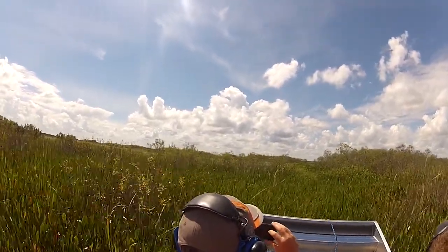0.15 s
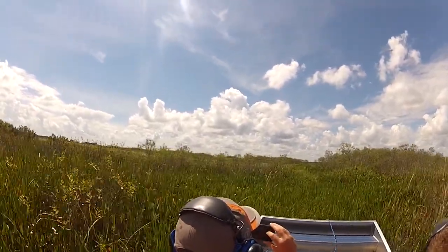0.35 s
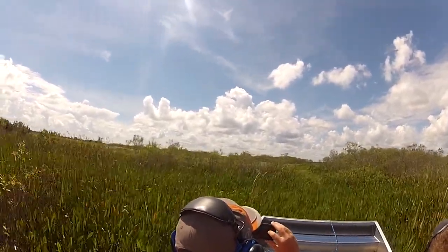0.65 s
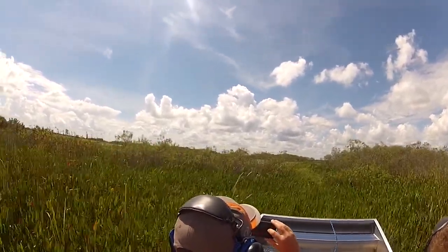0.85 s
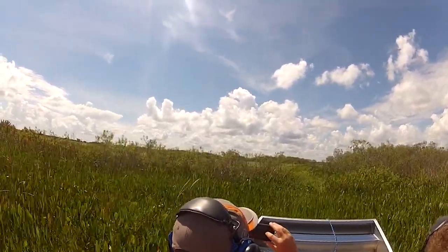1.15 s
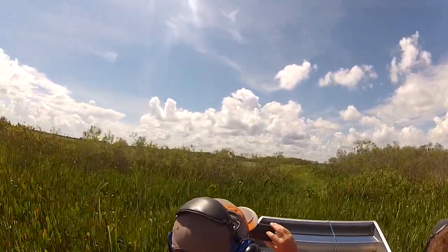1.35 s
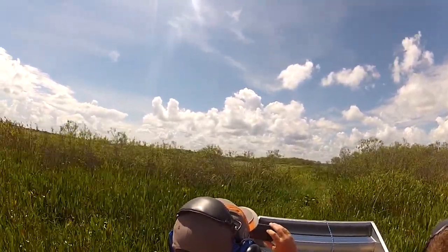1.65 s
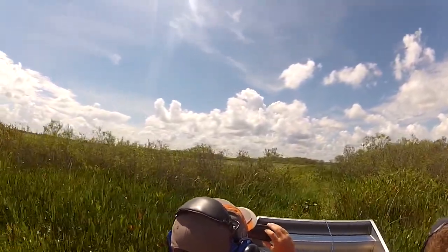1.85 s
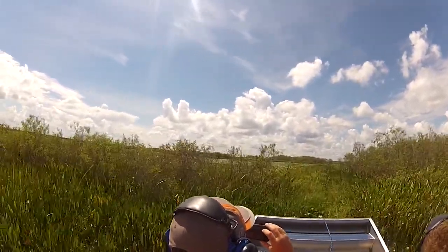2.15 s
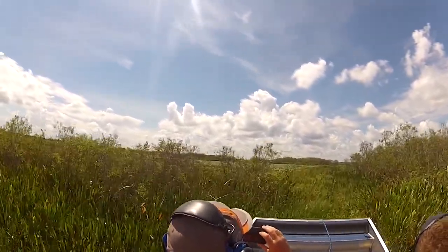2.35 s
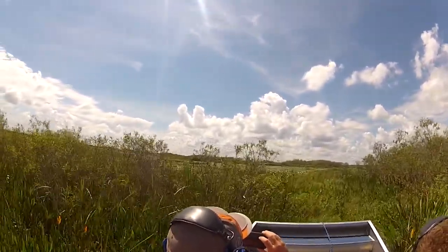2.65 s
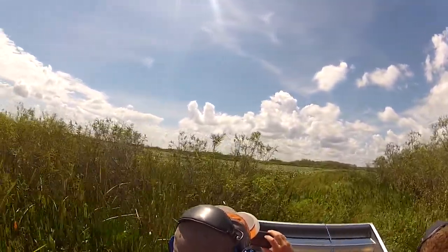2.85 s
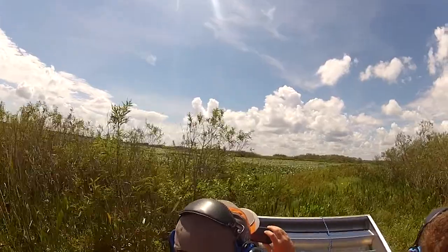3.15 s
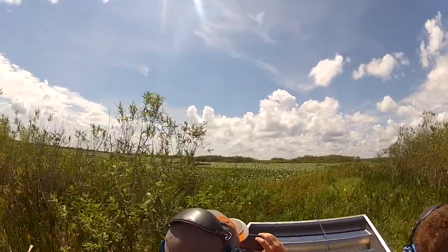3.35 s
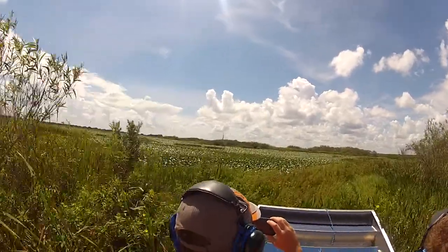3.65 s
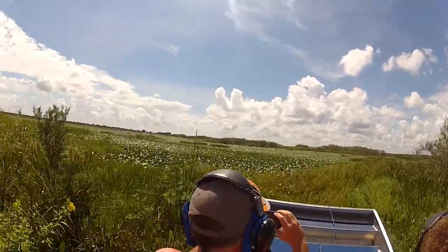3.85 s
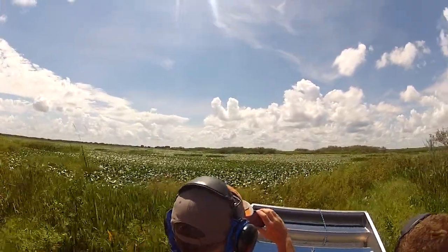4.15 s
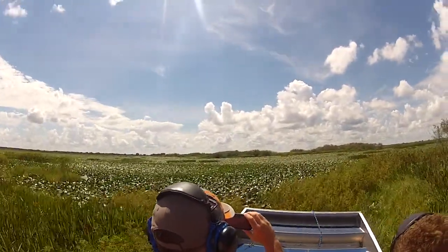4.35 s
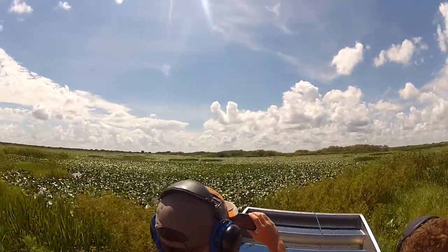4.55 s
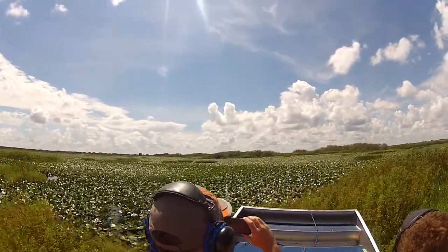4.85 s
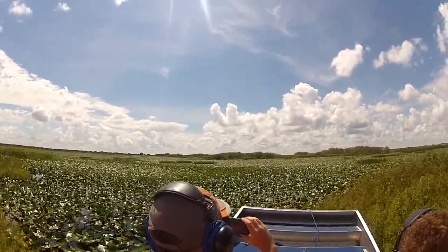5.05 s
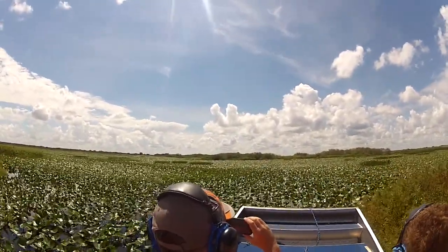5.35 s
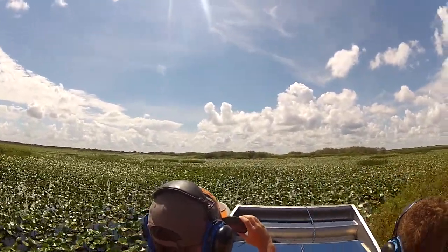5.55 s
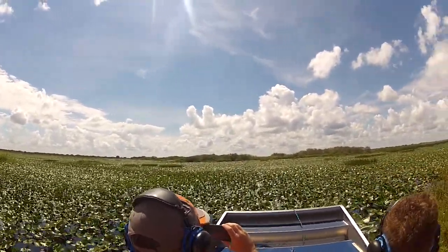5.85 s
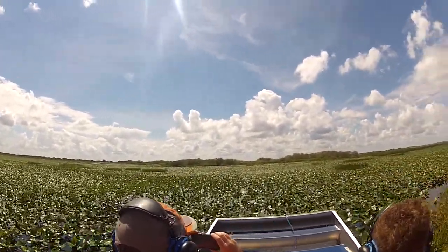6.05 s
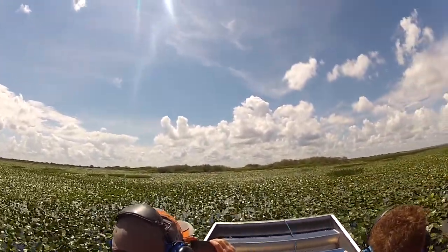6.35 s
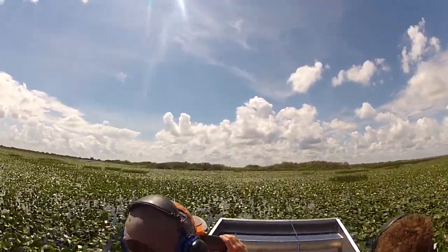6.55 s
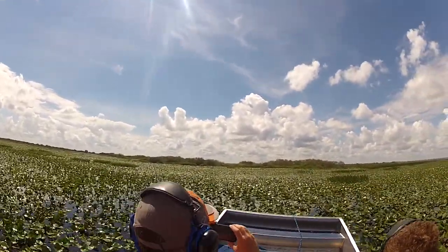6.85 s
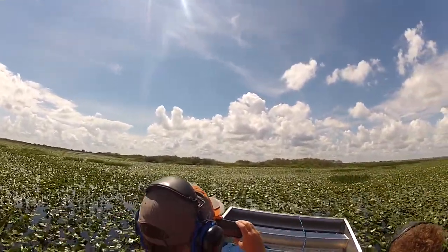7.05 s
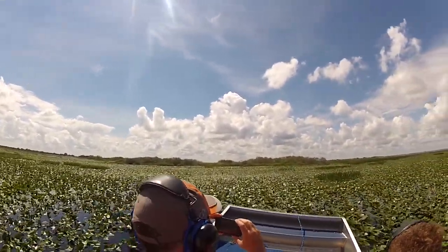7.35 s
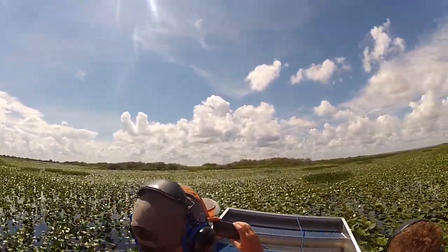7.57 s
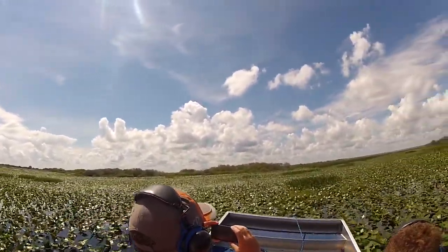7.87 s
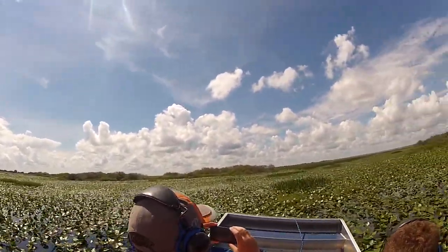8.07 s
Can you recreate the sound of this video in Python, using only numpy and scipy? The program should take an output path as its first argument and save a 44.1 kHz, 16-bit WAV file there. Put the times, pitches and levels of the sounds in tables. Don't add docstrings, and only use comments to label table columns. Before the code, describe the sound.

An airboat ride over open swamp, heard from on board through a small sealed camera. From 0 to about 2.5 seconds a big engine and propeller hold a steady cruise: a low, buzzing drone near 77 hertz with strong overtones, uneven exhaust throb beating against it, faint gear whine and windy hiss. A tiny metal tick comes at 1.4. From 2.5 the pitch and loudness climb, fastest after 3, reaching a full, dense roar around 4 with heavy slipstream rush and slight overload. Another tick falls at 4.4. The throttle eases, dropping quickly after 5, with a tick at 5.4, to a deeper, quieter drone by 6.8; a quick double tick at 6.5 and one last at 6.8. Then the engine pulls again, rising back to cruise by 7.6 and holding to the end, about 8.2. The sound is hollow in the mids, gritty on top, without echo.

```python
import sys
import numpy as np
from scipy import signal
from scipy.fft import rfft, irfft, next_fast_len
from scipy.io import wavfile
from scipy.ndimage import uniform_filter1d, map_coordinates

SR = 44100
rng = np.random.default_rng(int(sys.argv[2]) if len(sys.argv) > 2 else 0)


def gain_from_decibels(decibels):
    exponent = np.asarray(decibels, float) / 20
    return 10 ** exponent


def to_wav(sig):
    pcm = np.clip(np.atleast_2d(sig), -1, 1) * 32767
    pcm = np.round(pcm).astype(np.int16)
    wavfile.write(sys.argv[1], SR, pcm.T)


N = 362061
TIME = np.arange(N) / SR
CRUISE_HZ = 77

# (blade rate [Hz], blade tone [dB], octave [dB])
BLADE_TONE = [(65.4, -27.5, -21.5), (69.4, -28, -22.5), (75.9, -24, -21.5), (78.8, -22, -17.5),
              (82, -17.5, -19), (86.3, -16, -15.5), (91.9, -12.5, -7), (98, -13.1, -6.1)]
# (blade rate [Hz], harmonics 3, 4, 5 and 6 [dB])
LOW_HARMONICS = [(66.0, -29.0, -34.0, -42.0, -53.0), (70.0, -36.0, -39.0, -44.0, -49.0),
                 (75.0, -37.5, -47.5, -47.0, -50.5), (77.5, -41.5, -45.0, -47.0, -40.0),
                 (82.0, -38.0, -40.5, -51.0, -36.5), (86.0, -34.5, -37.5, -50.0, -40.0),
                 (90.0, -34.0, -34.0, -43.5, -37.0), (97.0, -27.5, -43.5, -36.0, -37.0)]
# (blade rate [Hz], harmonics 7, 8, 9 and 11 [dB])
MID_HARMONICS = [(66.0, -41.5, -50.5, -61.0, -63.0), (70.0, -55.0, -49.0, -61.0, -62.0),
                 (75.0, -46.5, -49.0, -47.5, -60.0), (77.5, -40.5, -51.5, -51.0, -54.5),
                 (82.0, -42.0, -46.0, -50.0, -48.5), (86.0, -46.5, -50.5, -53.0, -56.0),
                 (90.0, -41.0, -46.0, -56.5, -47.5), (97.0, -38.5, -46.5, -48.0, -34.5)]
# (blade harmonic [number], growth [dB per unit of load], negative where load
HARMONIC_LOAD = [(3, 2.4), (4, -1.2), (5, 2), (6, .2), (7, -.7), (8, 1.4), (9, .7), (11, 2.3)]
# (harmonic [number], rms level slow, cruising, climbing and full [dB])
HIGH_HARMONICS = [(10, -54.5, -54.5, -54.0, -47.0), (12, -62.0, -50.5, -52.5, -39.5),
                  (13, -60.0, -52.0, -43.0, -61.5), (14, -65.0, -47.5, -54.0, -63.5),
                  (20, -62.0, -61.5, -65.5, -49.5), (24, -62.5, -60.5, -56.5, -49.0)]
# (shaft harmonic [number], rms level slow, cruising, climbing and full [dB])
SHAFT_IMBALANCE = [(1, -63.5, -57.0, -55.0, -49.0), (2, -59.0, -54.0, -48.0, -44.0),
                   (4, -48.0, -44.0, -45.0, -49.5), (5, -50.5, -46.5, -47.5, -38.0),
                   (10, -50.0, -52.5, -58.5, -49.5)]


def propeller(passes):
    tone_db, octave_db = at_speed(BLADE_TONE)
    speed, load = throttle()
    overtones_db = 1.4
    gain_db = overtones_db + .08 * np.maximum(speed - CRUISE_HZ, 0)
    blade = passes + .5
    octave_lead = by_speed((.07, -.01, .17))
    twelfth_lead = .17

    sound = tone(blade, tone_db, flutter_db=0.53, slip=.004)
    sound += tone(2 * blade + octave_lead, octave_db, flutter_db=0.4, slip=0.0082)
    harmonics_db = at_speed(LOW_HARMONICS) + at_speed(MID_HARMONICS)
    for db, (k, load_db) in zip(harmonics_db, HARMONIC_LOAD):
        sound += tone(k * blade + twelfth_lead, db + load_db * load + gain_db, flutter_db=1.8, slip=0.03)
    for k, *db in HIGH_HARMONICS:
        sound += tone(k * (blade + .4), by_setting(db) + overtones_db, flutter_db=1.8, slip=.035)

    shaft = blade / 3
    for k, *db in SHAFT_IMBALANCE:
        sound += tone(k * shaft, by_setting(db), flutter_db=4.5, slip=0.12)
    return sound


# (blade rate [Hz], camshaft orders 5, 6, 8 and 11 [dB])
MAIN_ORDERS = [(66.0, -29.6, -44.6, -32.2, -40.2), (70.0, -29.6, -37.2, -31.3, -34.6),
               (75.0, -31.9, -30.6, -35.6, -37.5), (78.0, -25.4, -26.8, -30.0, -45.2),
               (82.0, -26.9, -24.0, -29.2, -51.2), (86.0, -27.9, -27.6, -32.9, -49.0),
               (90.0, -30.1, -32.9, -32.3, -49.5), (97.0, -39.7, -32.7, -31.6, -43.7)]
# (camshaft order [number], rms level slow, cruising, climbing and full [dB])
WEAK_ORDERS = [(2, -52.5, -44.0, -39.5, -34.5), (7, -47.5, -41.0, -44.5, -46.5),
               (12, -58.5, -43.5, -51.0, -49.5), (14, -62.0, -53.5, -52.0, -52.0),
               (15, -63.0, -53.5, -52.0, -50.0), (16, -51.0, -52.0, -52.0, -52.0)]
# (blade rate [Hz], camshaft orders 3, 4, 9 and 10 [dB])
BETWEEN_ORDERS = [(66.0, -49.5, -44.0, -49.5, -48.5), (70.0, -52.5, -48.0, -44.0, -58.5),
                  (75.0, -42.0, -47.5, -39.0, -50.5), (77.5, -48.5, -51.5, -41.0, -38.0),
                  (82.0, -41.5, -45.5, -41.0, -41.5), (86.0, -35.5, -47.0, -43.0, -33.0),
                  (90.0, -37.0, -41.0, -42.5, -31.5), (97.0, -37.5, -34.0, -43.0, -36.5)]
# (camshaft order [number], growth [dB per unit of load])
BETWEEN_ORDER_LOAD = [(3, .7), (4, .4), (9, 2.7), (10, -.5)]


def exhaust(passes):
    cam = .38186 * passes + .025
    load = throttle()[1]
    fifth_db, sixth_db, firing_db, eleventh_db = at_speed(MAIN_ORDERS)
    firing_lead = by_speed((.1, -.15, .3))
    sound = tone(5 * cam, fifth_db + 1.9 * load, flutter_db=1.0, slip=0.047)
    sound += tone(6 * cam, sixth_db + .9 * load, flutter_db=1.0, slip=0.047)
    sound += tone(8 * cam + firing_lead, firing_db + 2.1 * load, flutter_db=1.0, slip=0.047)
    sound += tone(11 * cam, eleventh_db + 3.7 * load, flutter_db=1.0, slip=0.047)

    minor_db = .3
    for k, *db in WEAK_ORDERS:
        sound += tone(k * (cam + 0.252), by_setting(db) + minor_db, flutter_db=2.5, slip=0.059)
    for db, (k, load_db) in zip(at_speed(BETWEEN_ORDERS), BETWEEN_ORDER_LOAD):
        sound += tone(k * (cam + 0.255), db + load_db * load + minor_db, flutter_db=3.0, slip=0.051)
    return sound


# (blade rate [Hz], reduction gear whine [dB], pump whine [dB])
GEAR_WHINE = [(66.2, -41, -70), (67.6, -56, -70), (69.5, -46, -70), (71.5, -57, -70), (73.5, -47, -70),
              (75.8, -60, -70), (77, -49, -68), (78.3, -46, -46), (80, -58, -62), (83, -40, -62),
              (88, -55, -70)]


def gears(passes):
    gear_db, pump_db = at_speed(GEAR_WHINE)
    load = throttle()[1]
    pump = tone(124 / 3 * passes, pump_db, flutter_db=1.5, slip=0.12)
    return pump + tone(110 / 3 * passes, gear_db + 1.5 * load, flutter_db=2, slip=0.15)


# (frequency [Hz], level [dB per Hz])
WASH_SPECTRUM = [(25, -6), (45, -9), (110, -11), (170, 8.5), (300, -3), (420, -2), (600, -36)]
# (frequency [Hz], level [dB per Hz])
BODY_SPECTRUM = [(250, -22), (400, -3.5), (560, 2.5), (680, 2), (780, -6), (900, -4.5), (1000, -12),
                 (1200, -29)]
# (frequency [Hz], level [dB per Hz])
CAVITY_SPECTRUM = [(700, -14.5), (950, -7), (1040, -3), (1112, 5.5), (1165, -4.5), (1240, -23), (1400, -25)]
# (frequency [Hz], level [dB per Hz])
HISS_SPECTRUM = [(1100, -54), (1240, -16), (1420, -9), (1760, -19), (1860, -7.5), (1940, 0), (2040, -6),
                 (2220, 0), (2400, -4.5), (3100, -7), (3350, -18), (3800, -23)]
# (frequency [Hz], level [dB per Hz])
THIN_HISS_SPECTRUM = [(2800, -30), (3450, 2.5), (4030, -2), (4220, 0), (4450, -2), (4800, -1), (5050, -1),
                      (5300, 0.5), (5950, -8.5), (6300, -40)]
# (cruising level [dB], growth [dB per Hz of blade rate], growth [dB per unit of load])
ROAR_LEVELS = [
    (-32.5, 0.3422, 0.29),
    (-37, 0.3167, 0.7),
    (-39.5, 0.2, 0),
    (-34.5, 0.2749, 1.1),
]


def slipstream(passes):
    speed, load = throttle()
    faster = speed - CRUISE_HZ
    hiss_db, cavity_db, body_db, wash_db = [
        db + speed_db * faster + load_db * load for db, speed_db, load_db in ROAR_LEVELS]
    chop = np.cos(2 * np.pi * passes)
    double_chop = np.cos(4 * np.pi * passes)

    wash = gain_from_decibels(wash_db) * rush(WASH_SPECTRUM, patchy_db=-2.1)
    body = gain_from_decibels(body_db) * rush(BODY_SPECTRUM, patchy_db=1.3)
    cavity = gain_from_decibels(cavity_db) * (1 + 0.026 * chop) * rush(CAVITY_SPECTRUM, patchy_db=0.4)
    thin_chop = 1 + 0.097 * chop + 0.056 * double_chop
    thin_hiss = gain_from_decibels(-9.5) * thin_chop * rush(THIN_HISS_SPECTRUM, patchy_db=1.07)
    hiss = rush(HISS_SPECTRUM, patchy_db=0.92) + thin_hiss
    hiss_gain = gain_from_decibels(hiss_db + 0.074 * wobble(24)) * (1 + 0.066 * chop)
    return wash + body + cavity + hiss_gain * hiss


# (time [s], peak level [dB], ring frequency [Hz])
TICKS = [
    (1.4162, -29, 2810),
    (4.3864, -27, 3130),
    (5.3717, -27, 3030),
    (6.5136, -30, 3030),
    (6.5214, -30, 2720),
    (6.783, -32, 2710),
]


def fittings():
    sound = np.zeros(N + SR)
    t = np.arange(SR // 20) / SR
    for s, db, hz in TICKS:
        contact = np.diff(rng.standard_normal(len(t) + 1))
        ring = np.sin(2 * np.pi * hz * t) + .5 * contact
        sound[round(s * SR):][:len(t)] += gain_from_decibels(db + 3 - 60 * t / .03) * ring
    return sound[:N]


# (time [s], blade rate [Hz], engine load [over 0 pulling, under 0 coasting])
THROTTLE_PATH = [(0.0, 78.34, -0.9), (0.68, 78.33, -1.0), (0.8, 77.62, -0.5), (1.44, 76.74, -1.3),
                 (2.44, 77.17, 1.6), (2.56, 78.04, 1.0), (3.36, 85.69, 0.6), (3.76, 94.35, 0.4),
                 (3.96, 97.13, -0.3), (4.34, 93.31, -0.4), (4.6, 92.05, 0.0), (5.36, 82.84, -0.3),
                 (5.68, 74.34, -2.6), (6.04, 70.1, -1.2), (6.32, 67.18, 0.1), (6.76, 66.2, 0.7),
                 (7.56, 74.88, 1.5), (8.21, 76.71, 2.0)]


def throttle():
    s, hz, load = np.transpose(THROTTLE_PATH)
    return np.interp(TIME, s, hz), np.interp(TIME, s, load)


def at_speed(rows):
    hz, *columns = np.transpose(rows)
    now = throttle()[0]
    return [np.interp(now, hz, c) for c in columns]


def by_speed(values):
    return np.interp(throttle()[0], (67, CRUISE_HZ, 94), values)


def by_setting(values):
    return np.interp(throttle()[0], (67, CRUISE_HZ, 84, 94), values)


def tone(turns, db, flutter_db=0., slip=0.):
    flutter, drift = wobble(9), wobble(6)
    return np.sqrt(2) * gain_from_decibels(db + flutter_db * flutter) * np.cos(2 * np.pi * (turns + slip * drift))


def wobble(rate):
    coarse = TIME[::64]
    knots = rng.standard_normal(int(N * rate / SR) + 4)
    return np.interp(TIME, coarse, map_coordinates(knots, [coarse * rate]))


def rush(spectrum, patchy_db):
    z = signal.stft(rng.standard_normal(N + 512), nperseg=512)[2]
    field = uniform_filter1d(rng.standard_normal(z.shape), size=3, axis=0)
    field = uniform_filter1d(field, size=5, axis=1)
    patchy = signal.istft(z * gain_from_decibels(patchy_db * unit(field)), nperseg=512)[1][:N]
    size = next_fast_len(N)
    closed = [(10, -60)] + list(spectrum) + [(SR / 2, -200)]
    gain = gain_from_decibels(along(closed, np.fft.rfftfreq(size, 1 / SR)))
    return unit(irfft(rfft(patchy, size) * gain, size)[:N])


def along(spectrum, hz):
    points_hz, db = np.transpose(spectrum)
    return np.interp(np.log(hz + 1), np.log(points_hz), db)


def unit(x):
    return x / np.sqrt(np.mean(x ** 2) + 1e-20)


def scene():
    passes = np.cumsum(throttle()[0]) / SR
    machine = propeller(passes) + exhaust(passes) + gears(passes)
    return (machine + slipstream(passes) + fittings())[None]


def band_limit(x):
    return signal.sosfilt(signal.butter(12, 16480, fs=SR, output="sos"), x)


def record(dry):
    coarse = signal.resample_poly(dry, 40, 147, axis=1)
    coarse = coarse / (1 + np.abs(coarse / 1.015) ** 16) ** (1 / 16)
    held = np.repeat(coarse, 4, axis=1)
    fine = signal.resample_poly(held, 147, 160, axis=1)[:, :N]
    size = next_fast_len(N)
    passband = np.fft.rfftfreq(size, 1 / SR) < 15300
    mix = irfft(rfft(fine, size) * passband, size)[:, :N]
    return band_limit(mix)


dry = scene()
out = record(dry)
to_wav(out)
```